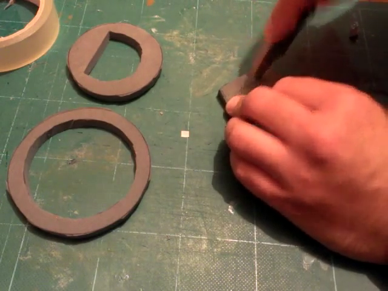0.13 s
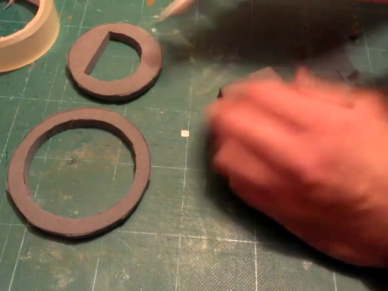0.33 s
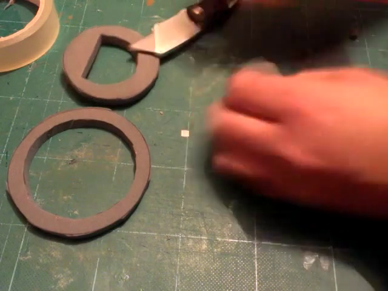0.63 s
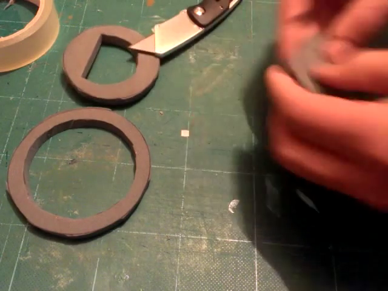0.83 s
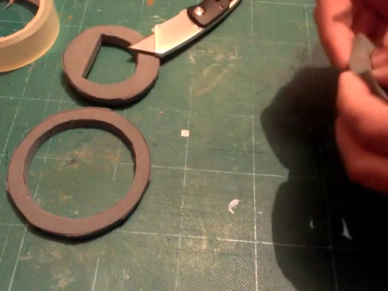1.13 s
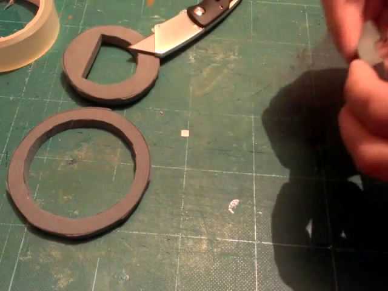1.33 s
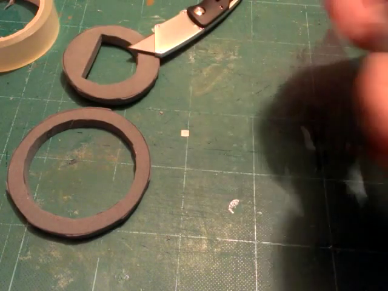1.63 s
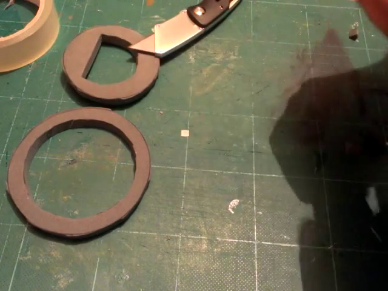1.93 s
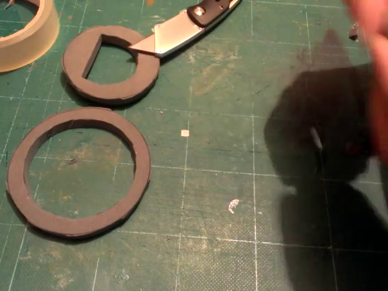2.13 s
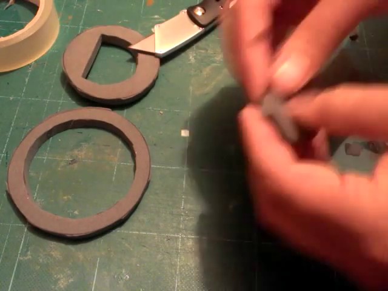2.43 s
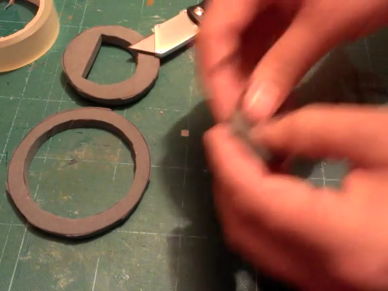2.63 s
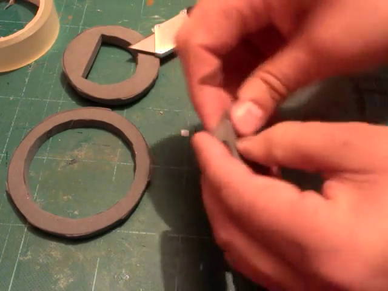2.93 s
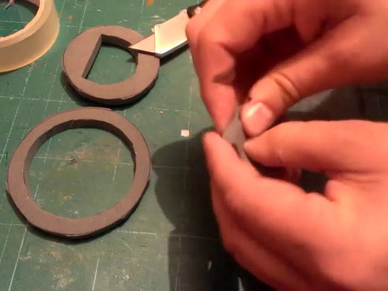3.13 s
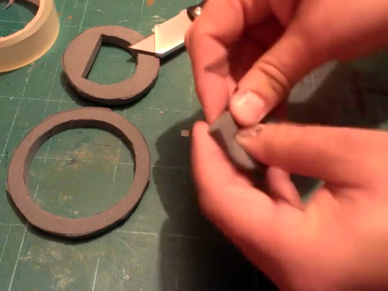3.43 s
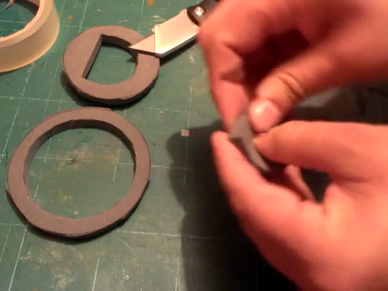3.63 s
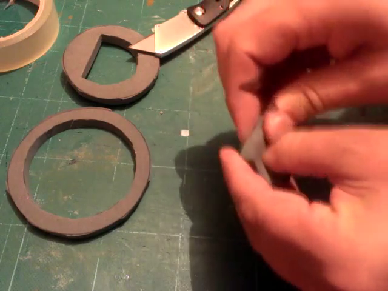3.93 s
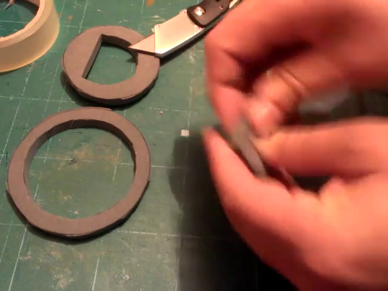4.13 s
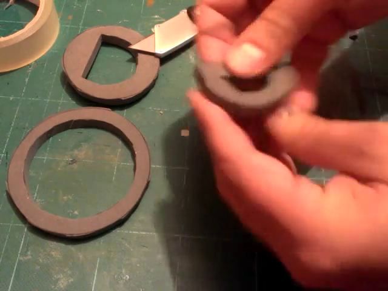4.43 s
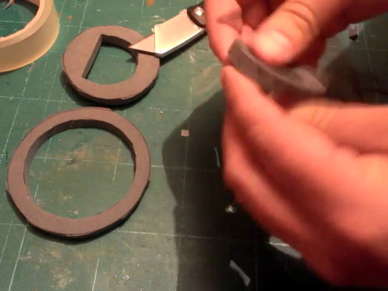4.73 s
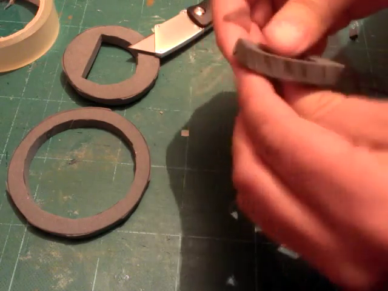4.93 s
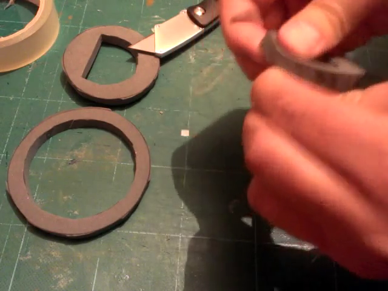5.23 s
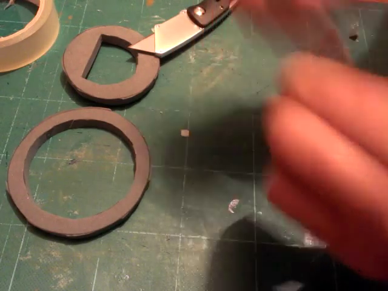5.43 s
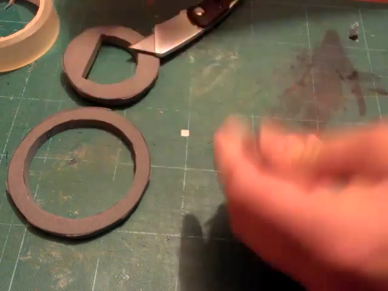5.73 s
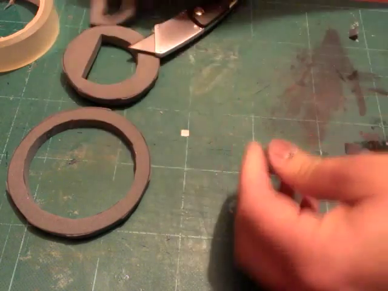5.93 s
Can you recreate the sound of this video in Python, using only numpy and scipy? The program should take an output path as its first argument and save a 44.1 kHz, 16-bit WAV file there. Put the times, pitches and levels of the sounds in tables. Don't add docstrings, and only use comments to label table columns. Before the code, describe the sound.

In a small quiet room, a knife whispers through foam and is set down on a mat-covered table with a hard knock and tiny bounces. Fingers then turn a foam ring near the microphone, making sparse dry rubs and ticks. A small sharp snap comes midway, a louder, fuller one about a second later, then faint handling and a soft hand knock over airy noise.

```python
import sys
import numpy as np
from scipy import signal
from scipy.fft import rfft, irfft
from scipy.io import wavfile
from scipy.ndimage import uniform_filter1d

SR = 44100
rng = np.random.default_rng(int(sys.argv[2]) if len(sys.argv) > 2 else 0)


def inscribe(sig):
    pcm = np.round(np.clip(np.atleast_2d(sig).T, -1, 1) * 32767)
    wavfile.write(sys.argv[1], SR, pcm.astype(np.int16))


def nominal_scale(level):
    x = np.asarray(level, float) / 20
    return 10 ** x


N = 267951

# middle_s, half_length_s, change_db
QUIET_MOMENTS = [(1.52, 0.042, -8.5), (2.28, 0.049, -5), (2.8, 0.072, -2.5), (5.4, 0.11, -3),
                 (5.9, .08, -1.5)]


def evened(x):
    return x / np.sqrt(np.mean(x ** 2) + 1e-20)


def read(points, hz):
    f, value = np.transpose(points)
    return np.interp(np.log(hz + 1), np.log(f + 1), value)


def add(mix, s, sound):
    part = mix[round(s * SR):][:len(sound)]
    part += sound[:len(part)]


def coloured(x, gain):
    return irfft(rfft(x) * gain(np.fft.rfftfreq(len(x), 1 / SR)), len(x))


def hump(hz, centre_hz, octaves):
    return np.exp(-.5 * (np.log2((hz + 1) / centre_hz) / max(octaves / 2, .05)) ** 2)


def swells(rows):
    t = np.arange(N) / SR
    return sum(db * np.cos(np.pi / 2 * np.clip((t - s) / half, -1, 1)) ** 2 for s, half, db in rows)


def patchy_noise(colour, patchy_db):
    hz = np.fft.rfftfreq(1024, 1 / SR)
    a, b, patches = rng.standard_normal((N // 256 + 5, 513, 3)).T
    patches = uniform_filter1d(patches, size=10, axis=0)
    patches = evened(uniform_filter1d(patches, size=8, axis=1))
    z = (a + 1j * b) * nominal_scale(read(colour, hz)[:, None] + patchy_db * patches)
    return evened(signal.istft(z, nperseg=1024, noverlap=768)[1][:N])


def pressure_step(log_gain, sudden):
    phase = sudden * signal.hilbert(log_gain).imag
    pulse = np.fft.ifft(np.exp(log_gain - 1j * phase)).real
    return np.roll(pulse, 256)[:1024] * signal.windows.tukey(1024, .3)


def air():
    # time_s, level_db
    busy_air = [(0.0, -65.5), (0.2, -56.5), (0.5, -55.5), (0.66, -47), (0.8, -61.5), (1.0, -65.5),
                (1.3, -63), (1.7, -58), (1.85, -62), (2.05, -60.5), (2.7, -62), (2.85, -64), (3.3, -65),
                (3.5, -64.5), (4.2, -64), (4.45, -56), (4.65, -62.5), (6.08, -64.5)]
    # pitch_hz, level_db (per Hz)
    rumble_colour = [(7.1, -31), (12, 0.5), (23, 3.5), (49, -5), (123, -11.5), (162, -12), (200, -14.5),
                     (260, -38), (440, -120)]
    body_colour = [(53, -25), (90, 1.5), (159, -3), (347, -5), (439, -7.5), (597, -8.5), (662, -9),
                   (969, -10.5), (1240, -13.5), (3000, -39.5), (3900, -64.5), (6600, -120)]
    rustle_colour = [(880, -15.5), (1500, -4.5), (1760, -3), (2680, -9), (5880, -20.5), (7220, -23),
                     (8290, -24.5), (15700, -35.5)]
    hiss_colour = [(2350, -29), (4000, -12), (9440, -15.5), (15100, -9), (15700, -17)]
    # middle_s, half_length_s, rise_db (over the rustle)
    sleeves = [(.2, 0.029, 6.5), (.55, 0.069, 6), (1.7, 0.096, 4.5), (3.4, 0.11, 5), (4.0, 0.086, 10),
               (4.22, 0.13, 3.5), (4.52, 0.075, 5.5), (6.0, 0.065, 6)]
    # middle_s, half_length_s, rise_db (over the rumble)
    puffs = [(.27, 0.36, 14), (.6, 0.14, 8), (1.42, 0.083, 5.5), (2.03, 0.11, 7), (2.42, 0.31, 6.5),
             (2.7, 0.089, 9), (3.1, .08, 9), (4.05, 0.17, 9.5), (4.32, 0.13, 6), (5.0, 0.079, 6),
             (5.6, 0.32, 7.5), (6.08, 0.15, 9)]
    rest_db = -64
    swell = np.interp(np.arange(N) / SR, *np.transpose(busy_air)) - rest_db
    clamp = swells(QUIET_MOMENTS)
    rumble = evened(coloured(rng.standard_normal(N), lambda f: nominal_scale(read(rumble_colour, f))))
    rumble *= nominal_scale(-65 + .2 * swell + swells(puffs) + clamp)
    body = nominal_scale(rest_db + swell + clamp) * patchy_noise(body_colour, patchy_db=2.46)
    rustle_level = nominal_scale(-76 + 0.78 * swell + swells(sleeves) + clamp)
    rustle = rustle_level * patchy_noise(rustle_colour, patchy_db=1.0)
    hiss = nominal_scale(-92.5) * patchy_noise(hiss_colour, patchy_db=.5)
    return rumble + body + rustle + hiss


def cupped_hands():
    # middle_s, half_length_s, rise_db
    hollows = [(.3, .25, 6), (1.36, 0.34, 15), (1.98, 0.32, 9.5), (4.45, 0.26, 15.5), (5.0, 0.28, 11)]
    tone = evened(coloured(rng.standard_normal(N), lambda f: hump(f, 760, .3)))
    return nominal_scale(-81 + swells(hollows) + swells(QUIET_MOMENTS)) * tone


def knocks():
    # start_s, peak_db, contact_ms, direction (+1 or -1), ring_factor (of pitch)
    blows = [(0.5273, -33.5, 0.67, 1, 1.3), (0.5526, -28, 1.3, -1, .9), (0.5846, -31, 1.3, -1, 0.81),
             (.6212, -7.4, .56, 1, 1), (0.633, -31, 0.15, 1, 0.47), (0.64, -34.5, 1.8, 1, 0.83),
             (0.6532, -39.5, 0.33, 1, 1.8), (0.6577, -38.5, 0.26, 1, 1.3), (0.6688, -32, 1.6, -1, 0.81),
             (.7180, -24.5, 0.56, 1, 1.03), (4.2303, -38, 0.48, 1, 1.2), (5.9785, -33.5, 0.56, 1, 1.04),
             (5.9898, -36, .7, 1, 1.6), ]
    # pitch_hz, level_db, t60_s (time to fade by 60 dB)
    mat_modes = [(258, -18, .06), (338, 4, .021), (412, -10, .087), (622, -4, .014), (1106, -8, .016),
                 (1343, -10.5, .03), (1722, -6, .013), (2130, 0, .01)]
    # pitch_hz, level_db, t60_s
    table_modes = [(136, -36, 0.068), (241.5, -27, 0.26), (831, -14.5, 0.045), (1974, -17.5, 0.058),
                   (3300, -25.5, .015)]
    out, t = np.zeros(N), np.arange(SR // 8) / SR
    for s, db, contact_ms, direction, ring in blows:
        modes = sum(nominal_scale(mode_db - 60 * t / t60) * np.cos(2 * np.pi * hz * ring * t + .36)
                    for hz, mode_db, t60 in mat_modes + table_modes)
        push = np.exp(-.5 * (t[:300] * 4000 / contact_ms - 2.5) ** 2)
        low_cut = signal.butter(1, 90, "high", fs=SR)
        blow = signal.lfilter(*low_cut, np.convolve(modes, push))
        add(out, s, np.sign(direction) * nominal_scale(db) * blow / abs(blow).max())
    return out


def rubs():
    # start_s, length_s, level_db, centre_hz, peak_place (0-1)
    blade_strokes = [(0, 0.035, -78.5, 6000, 0.14), (0.09, 0.2, -78.5, 8000, 0.18),
                     (0.184, 0.083, -68, 6900, 1), (0.3, 0.066, -79.5, 7000, 0.1),
                     (0.361, 0.03, -75, 9500, 0.7), (0.431, 0.087, -72, 6200, 0.9),
                     (0.52, 0.037, -57, 5600, 0.9), (0.554, .025, -69, 6000, 0.9),
                     (0.6276, 0.043, -58, 4000, .05), (0.679, 0.074, -64, 7700, .95),
                     (0.825, 0.088, -77, 7100, 0.2), (0.968, 0.13, -79, 7000, 0.2)]
    # start_s, length_s, level_db, centre_hz, width_octaves
    finger_rubs = [(1.42, 0.035, -79, 6500, 1.1), (1.544, 0.089, -69, 9000, 4.5),
                   (1.634, 0.12, -68.5, 6450, 2.5), (1.808, 0.038, -72, 6900, 2.2),
                   (2.133, 0.23, -83.5, 7960, 1.5), (2.313, 0.095, -74.5, 6760, 2),
                   (2.452, 0.047, -65.5, 6960, 2.9), (2.752, 0.018, -78, 7660, 0.73),
                   (3.039, 0.012, -70, 6000, 2.9), (3.216, .012, -76, 10100, 1.4),
                   (3.391, 0.033, -69, 5000, 2.9), (3.905, 0.032, -79, 8000, 1.6),
                   (3.934, .014, -80, 5000, 3.1), (4.178, 0.1, -72.5, 7400, 1.7),
                   (4.294, 0.02, -78.5, 9000, .8), (4.447, .12, -74.5, 5500, 4.2),
                   (4.585, 0.046, -78.5, 6960, 1.4), (4.757, 0.032, -76.5, 8150, 1.2),
                   (4.816, 0.089, -78, 8700, 0.15), (4.83, 0.067, -65.5, 6700, 2.7),
                   (5.218, 0.059, -82, 3970, 0.77), (5.475, 0.041, -74, 5000, 1.7),
                   (5.746, 0.048, -81, 7900, 2.8), (5.99, 0.049, -86, 7000, 2.4)]
    # pitch_hz, width_octaves, gain_db
    foam_peaks = [(2200, 0.81, 12), (5550, 0.13, 5), (8750, 0.07, 2.5), (11000, .08, -2), (15900, .5, -5)]
    # pitch_hz, width_octaves, gain_db
    blade_rings = [(3950, .06, 12), (5900, .07, 8), (11000, .06, 6)]
    strokes = [(*row, 1.7, blade_rings) for row in blade_strokes]
    strokes += [(*row[:4], 0.22, row[4], []) for row in finger_rubs]
    out, size = np.zeros(N), 8192
    t = np.arange(size) / SR
    for s, length, db, hz, place, octaves, rings in strokes:
        grains = rng.standard_normal(size) * nominal_scale(2.25 * rng.exponential(1, size))
        lean = rng.uniform(0.927, 0.98)
        grains = coloured(grains, lambda f: hump(f, hz, octaves) * nominal_scale(
            sum(peak_db * hump(f, peak_hz * lean, w) for peak_hz, w, peak_db in foam_peaks)))
        grains = coloured(grains, lambda f: nominal_scale(
            0 * f + sum(ring_db * hump(f, ring_hz, w) for ring_hz, w, ring_db in rings)))
        slips = evened(uniform_filter1d(rng.standard_normal(size), size=150, mode="wrap"))
        stroke = np.interp(t / length, [0, np.clip(place, .05, .95), 1], [0, 1, 0]) ** .6
        add(out, s, nominal_scale(db + 2.5 * slips) * evened(grains) * stroke)
    return out


def ticks():
    # start_s, low_db, low_hz, high_db, high_hz
    quick_ticks = [(0.2097, -66, 3000, -81, 7870), (0.5253, -63, 2480, -80, 6000),
                   (0.6221, -44, 3200, -43, 5900), (0.72, -60.5, 2480, -75.5, 7060),
                   (1.55, -66, 2200, -71, 11000), (1.6092, -65, 2350, -67, 9000),
                   (2.3392, -63.5, 2300, -64, 8400), (3.0568, -44, 2000, -45, 6530),
                   (3.2191, -67.5, 4150, -64.5, 1900), (3.265, -91, 5000, -85, 10000),
                   (3.794, -74, 3000, -90, 8000), (3.8298, -75, 3000, -82, 6000),
                   (3.9117, -62.5, 2100, -68, 5600), (4.186, -77, 3000, -68, 6900),
                   (4.2294, -59, 1700, -64, 5720), (4.9625, -63, 2200, -74.5, 8800),
                   (5.0989, -74, 2950, -68, 7560), (5.4872, -47.5, 2800, -63, 5500),
                   (5.6121, -59.5, 760, -76, 8500), (5.6124, -63, 2290, -73, 5000),
                   (5.79, -63, 2380, -59.5, 8060), (5.958, -59.5, 2670, -61, 7550),
                   (5.979, -68, 5200, -70, 13000), (5.9864, -48.5, 1940, -60.5, 9900)]
    # start_s, low_db, low_hz, high_db, high_hz
    slow_peels = [(1.822, -62.5, 2050, -56.5, 6200), (2.044, -73, 3010, -72, 7700),
                  (3.3977, -57, 1280, -60, 2200), (3.3984, -62.5, 3330, -64.5, 8000),
                  (5.485, -60, 5370, -58.5, 11000), (5.4893, -60, 980, -78, 7000)]
    bursts = [(*row, 2.34) for row in quick_ticks] + [(*row, 5.7) for row in slow_peels]
    out, t = np.zeros(N), np.arange(2048) / SR - .01
    for s, low_db, low_hz, high_db, high_hz, burst_ms in bursts:
        u = np.maximum(t, 0) * 1000 / burst_ms
        cracks = rng.standard_normal(len(t)) * u * np.exp(-2.5 * u)
        lumps = uniform_filter1d(abs(rfft(cracks)), size=9)
        for db, hz, octaves in (low_db, low_hz, .7), (high_db, high_hz, 1.1):
            part = coloured(cracks, lambda f: hump(f, hz, octaves) / lumps ** 0.38)
            add(out, s - .01, nominal_scale(db + 8.) * part * (t > -.0004) / abs(part).max())
    return out


def snaps():
    # start_s, peak_db, suddenness (0-1), small_crack_share, tearing_ms
    tears = [
        (3.0538, -24.5, 0.86, 0.21, 1.14),
        (3.9495, -8.5, 0.1, 0.073, 2.7),
    ]
    # pitch_hz, level_db (per Hz)
    tear_colours = [
        [(88, -33), (150, -8), (601, 5), (1300, -5), (2350, -8), (3840, -16), (4580, -6.5), (6390, -1),
         (6910, -9.5), (8900, -7), (10000, -24), (11500, -15), (16000, -29)],
        [(47, -48), (80, -15), (563, 5.5), (1430, 1.5), (3240, -13.5), (4230, -37), (5170, -11.5), (5900, -16),
         (7050, -14), (7870, -24), (8600, -17.5), (10700, -28), (11700, -24.5), (16000, -51)],
    ]
    near, far, size = np.zeros(N), np.zeros(N), 4096
    hz = abs(np.fft.fftfreq(size, 1 / SR))
    for (s, db, sudden, share, tearing_ms), colour in zip(tears, tear_colours):
        log_gain = np.log(nominal_scale(np.maximum(read(colour, hz), -100)))
        fading = np.exp(-np.arange(200) / SR * 1000 / tearing_ms)
        cracks = share * rng.standard_normal(200) * fading
        cracks[0] = 1
        crack = np.convolve(pressure_step(log_gain, np.clip(sudden, 0, 1)), cracks)
        smooth_gain = uniform_filter1d(np.exp(log_gain), size=150, mode="wrap")
        smooth = pressure_step(np.log(smooth_gain), 0.59)
        crack *= nominal_scale(db) / abs(crack).max()
        start = s - 256 / SR
        add(near, start, crack)
        add(far, start, smooth * np.linalg.norm(crack) / np.linalg.norm(smooth))
    return near, far


def room(x):
    # pitch_hz, t60_s
    fading = [(200, 0.097), (530, 0.24), (1390, 0.16), (3680, 0.18), (9700, 0.15)]
    taps = np.zeros(SR // 2)
    at = np.arange(60, SR // 2 - 20, 20)
    taps[at + rng.integers(0, 20, len(at))] = rng.choice([-1., 1.], len(at))
    hz, t, z = signal.stft(taps, SR, nperseg=256)
    tail = signal.istft(z * nominal_scale(-60 * t / read(fading, hz)[:, None]), SR, nperseg=256)[1]
    tail = coloured(tail, lambda f: nominal_scale(5.2 * hump(f, 950, 0.78) + 2.2 * hump(f, 6800, 0.33)))
    tail = nominal_scale(-9.5) * tail / np.linalg.norm(tail)
    add(tail, .0046, nominal_scale([-18]))
    return signal.fftconvolve(x, tail)[:N]


def scene():
    table, (snap, far_snap), tick = knocks(), snaps(), ticks()
    table_late = np.roll(table, 150)
    table_late = coloured(table_late, lambda f: np.clip(f / 1600.0, .05, 1.6) ** 0.35)
    wet = room(nominal_scale(-2.0) * table_late + nominal_scale(-0.5) * far_snap + nominal_scale(-1.5) * tick)
    soft = tick + rubs() + air() + cupped_hands()
    soft = coloured(soft, lambda f: f < 15800)
    return (table + snap + wet + soft)[None]


def band_limit(x):
    return signal.sosfilt(signal.butter(12, 16520, fs=SR, output="sos"), x)


def record(dry):
    return band_limit(dry)


dry = scene()
out = record(dry)
inscribe(out)
```